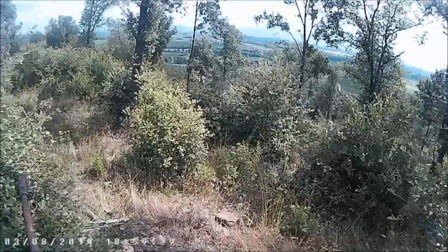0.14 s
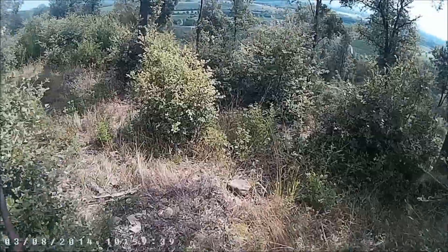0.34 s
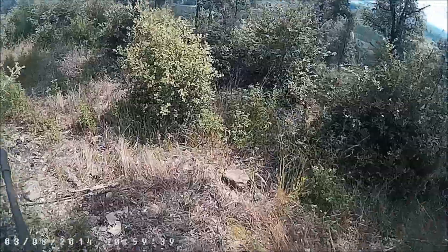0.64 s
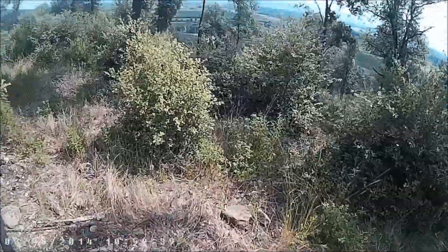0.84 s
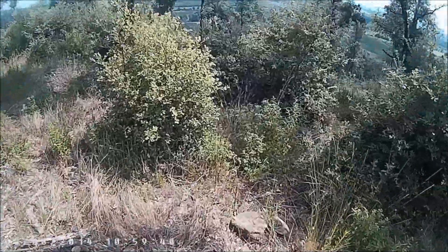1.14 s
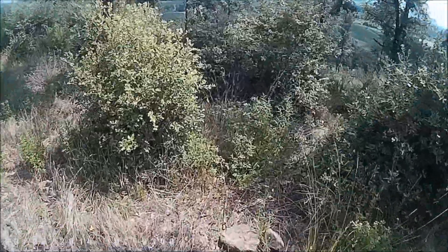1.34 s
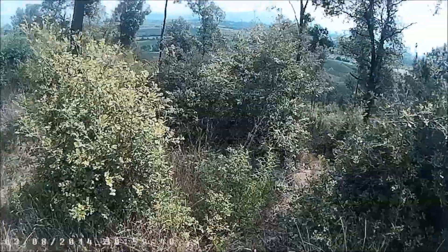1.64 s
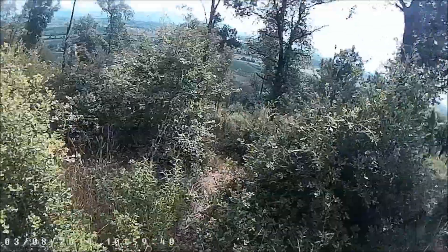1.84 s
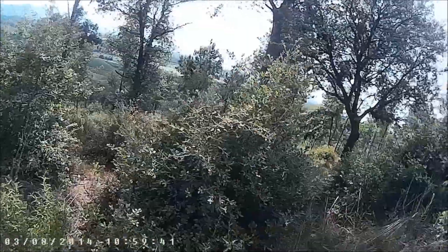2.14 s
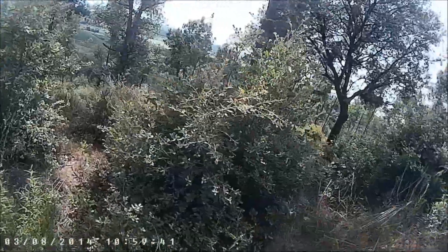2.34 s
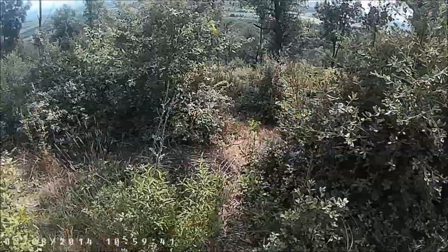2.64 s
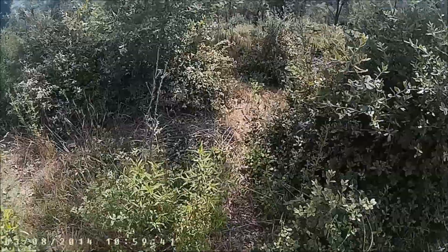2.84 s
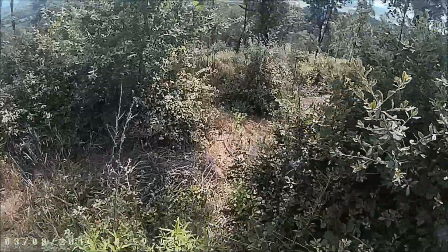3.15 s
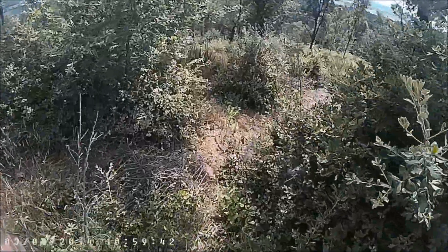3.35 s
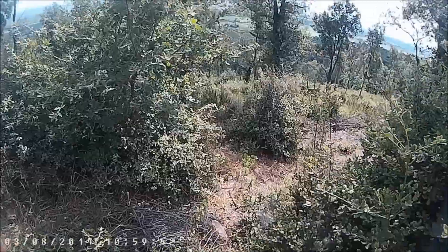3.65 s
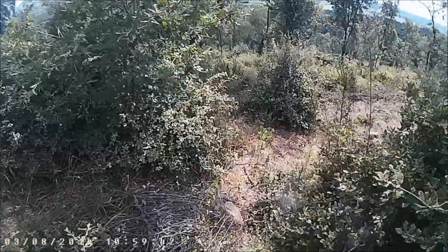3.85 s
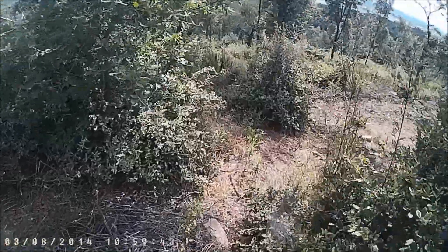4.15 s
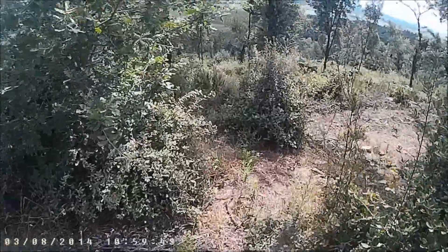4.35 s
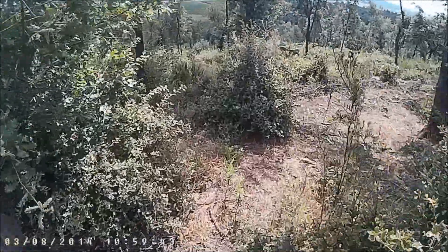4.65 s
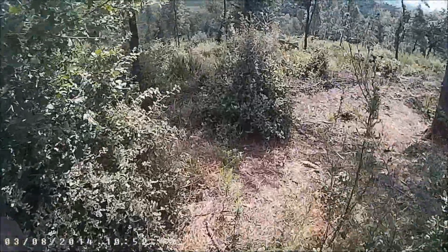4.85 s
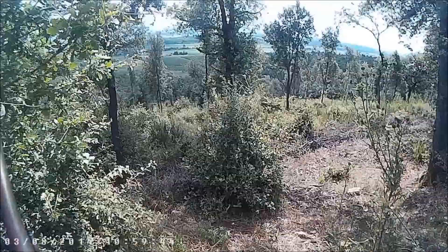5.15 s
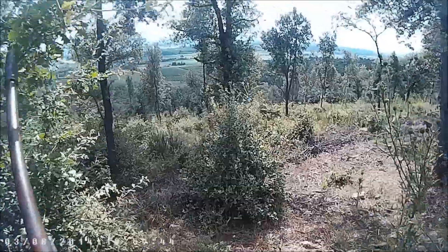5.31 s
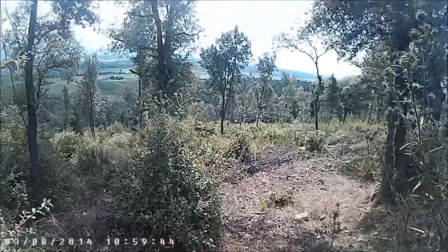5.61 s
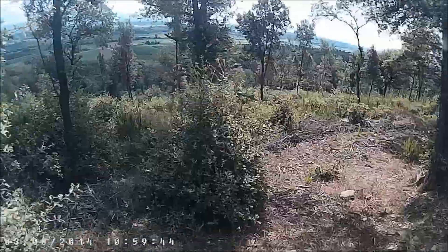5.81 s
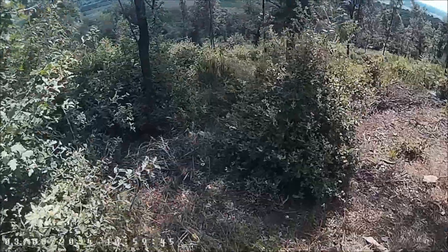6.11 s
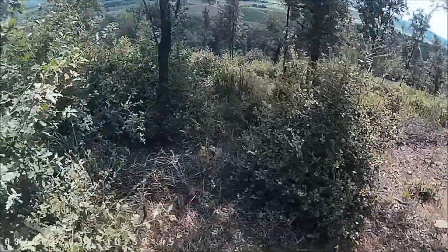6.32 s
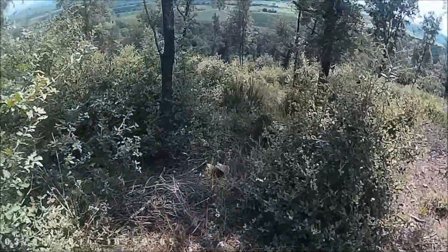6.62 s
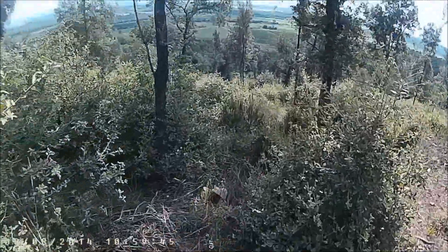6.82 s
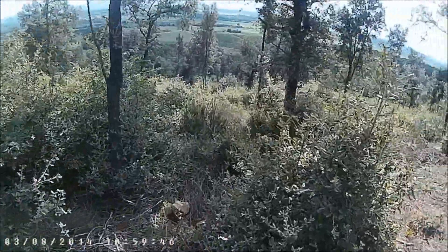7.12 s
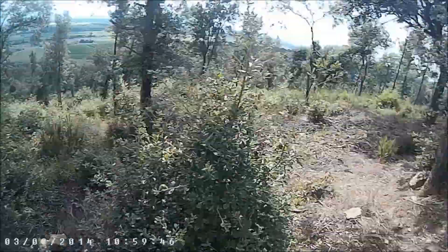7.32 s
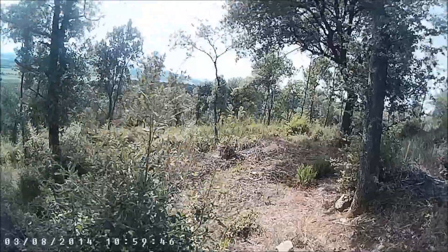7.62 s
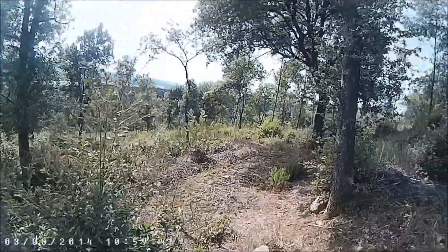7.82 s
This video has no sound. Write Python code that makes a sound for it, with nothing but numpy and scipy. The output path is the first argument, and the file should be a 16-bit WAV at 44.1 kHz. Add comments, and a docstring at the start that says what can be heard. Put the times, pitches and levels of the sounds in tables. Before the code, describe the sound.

Deep, irregular thumps and a swaying rumble dominate as a body-worn camera is carried through dry scrub. Quieter footsteps crunch on leaf litter, and leaves and branches brush past. Small twigs snap during the first heavy steps; midway a heavy footfall brings a cluster of plastic knocks and dull stick cracks. Softer steps follow, with another rattle near the end, over faint hiss and a very faint high whine.

```python
"""Walking through dry brush

A small camera is carried on the body. Each footfall sets its mount swaying with a deep thump,
and impacts excite the modes of the plastic case and the mount, heard as knocks and rattles.
Leaf litter and grass rustle and crackle with every stride and a few twigs snap,
over the hiss and thin whine of the electronics."""
import sys
import numpy as np
from scipy import signal
from scipy.fft import rfft, irfft, next_fast_len
from scipy.io import wavfile
from scipy.ndimage import map_coordinates

SR = 44100
rng = np.random.default_rng(int(sys.argv[2]) if len(sys.argv) > 2 else 0)


def generate_wav(signal):
    """Clip the signal to [-1, 1] and save it as 16-bit WAV at the path in sys.argv[1]."""
    frames = np.transpose(np.atleast_2d(signal))
    scaled = np.clip(frames, -1, 1) * 32767
    pcm = np.round(scaled).astype(np.int16)
    wavfile.write(sys.argv[1], SR, pcm)


N = 351477

# footfalls and lighter shifts of weight:
# (time [s], level [dB], rise [s], T60 [s], litter crunch [dB], following leaf swish [dB])
STEPS = [(0.0, -13, 0.0068, 0.27, -52, -63), (.201, -25, 0.14, 0.11, -63.5, -61.5),
         (.491, -10, .035, 0.52, -52, -62.5), (0.618, -24.5, 0.15, 0.33, -62, -60),
         (0.888, -9, 0.032, 0.43, -54.5, -59.5), (1.117, -11.5, .044, 0.55, -56, -56.5),
         (1.584, -13.5, 0.058, 0.25, -55.5, -60.5), (1.78, -30.5, 0.19, 0.52, -60.5, -62),
         (2.016, -16, .07, 0.35, -53, -61.5), (2.601, -19, .11, 0.46, -52.5, -62),
         (2.789, -24.5, 0.04, 0.43, -55, -60.5), (3.175, -19, 0.029, 0.59, -55, -57.5),
         (3.701, -7.5, 0.095, 0.4, -53.5, -81), (3.935, -17, 0.15, 0.3, -58, -57.5),
         (4.538, -19, .1, .3, -65, -60.5), (5.009, -20, 0.16, 0.21, -59, -60),
         (5.21, -32, 0.12, 0.78, -68, -63), (5.568, -16, 0.096, .6, -63.5, -59),
         (6.238, -21.5, 0.059, 0.43, -74, -61), (6.808, -34.5, 0.074, 1.0, -63, -62),
         (7.285, -14.5, 0.1, 0.25, -53, -61), (7.402, -26.5, 0.13, 0.2, -58, -63.5),
         (7.702, -27.5, .025, 0.45, -65, -69)]
# spectrum of a dull crack, from the case or a stick: (frequency [Hz], relative level [dB])
CRACK_SPECTRUM = [(300, 8), (900, 11.5), (1800, -4.5), (2500, 0), (2900, 4.5), (4400, -5.5), (5200, -39),
                  (9000, -56)]


def footfalls(sway_hz, wander, shudder_db):
    """Damped oscillation: each load swings the mount; its shudder grows nonlinearly with the load."""
    # spectrum of the shudder: (frequency [Hz], relative level [dB])
    shudder_spectrum = [(35, -6), (52, 4.5), (66, 5), (90, -9), (140, -20), (260, -58), (800, -120)]
    thumps, weight, t = np.zeros(N), np.zeros(N), np.arange(SR) / SR
    for s, db, rise, t60, _, _ in STEPS:
        swing = amp(db) * loading(t, rise, t60)
        drift = np.interp(t, np.linspace(0, 1, 25), rng.standard_normal(25))
        phase = 2 * np.pi * sway_hz * np.cumsum(1 + wander * drift) / SR
        add(thumps, s, swing * np.sin(phase))
        add(weight, s, swing)
    shudder = amp(shudder_db) * weight ** 1.87 * coloured(rng.standard_normal(N), shudder_spectrum)
    return thumps + shudder


def loading(t, rise, t60):
    """Onset and damping: weight comes onto the foot smoothly, then its effect decays exponentially."""
    onset = np.sin(np.pi / 2 * np.clip(t / rise, 0, 1)) ** 2
    return onset * amp(-60 * np.maximum(t - rise, 0) / t60)


def knocks(click_db, thud_db, crack_db, bump_db):
    """Impact excitation: hard contacts crack and ring case and mount; soft ones stir only the mount."""
    # hard contacts of the case: (time [s], click level [dB], thud level [dB], sharpness [dB])
    contacts = [(0.512, -30.5, -33, -8), (.53, -38, -25, 6), (.537, -38, -30, 3), (.576, -40.5, -44, 3),
                (.908, -31.5, -25, -1.5), (0.92, -39.5, -27, 1), (.975, -43.5, -33.5, 2),
                (.99, -41, -36, 0), (1.168, -47, -29.5, 6), (1.271, -34.5, -33.5, -7), (1.515, -39, -36, 0),
                (1.951, -37, -33.5, -1.5), (2.425, -40.5, -38, 2), (2.67, -35, -29, 1),
                (2.685, -35.5, -27, -3), (3.664, -46, -41.5, 7), (3.745, -40.5, -32, -8),
                (3.777, -21.5, -18.5, 0), (3.791, -40, -26.5, 2), (3.831, -38.5, -26, -4),
                (4.014, -46.5, -26.5, 9), (4.151, -29.5, -29, -1.5), (5.422, -33.5, -35, -3.5),
                (5.821, -30.5, -37, 7), (7.007, -50, -65, -4), (7.139, -48, -41, 0.5),
                (7.228, -41.5, -28.5, 9), (7.329, -44.5, -31, -3), (7.511, -48, -37, 0)]
    # soft bumps against the mount: (time [s], level [dB])
    bumps = [(.004, -28.5), (0.104, -36), (0.451, -38.5), (0.723, -29), (.786, -33), (1.613, -32),
             (1.792, -35.5), (2.636, -37.5), (2.85, -45), (3.187, -37.5), (3.62, -39.5), (3.767, -26),
             (3.947, -34.5), (3.998, -34.5), (4.046, -31), (5.106, -38), (5.161, -33.5), (7.345, -29),
             (7.366, -27), (7.397, -30), (7.712, -46)]
    # modes of the case and of the mount: (frequency [Hz], relative level [dB], T60 [s])
    case_modes = [(830, -2.5, 0.012), (999, -21, 0.078), (1180, 0, 0.033), (1313, 2, 0.014),
                  (1578, -10, 0.037), (1763, -20, 0.053), (2163, -10, 0.014)]
    mount_modes = [(60.5, -3.5, 0.11), (91.4, 0, 0.07), (150.8, -1, 0.052), (230.2, -1, 0.072),
                   (330.5, -12, 0.054), (400.5, -3, 0.051), (540, -7.5, 0.013)]
    out = np.zeros(N)
    for s, click, thud, sharpness in contacts:
        # a sharper contact brings out the upper modes and the crack
        modes = [(hz, db + 0.57 * sharpness * (hz > 1450), t60) for hz, db, t60 in case_modes]
        case = strike(modes, vary_db=4.5, chatter=0.52, chatter_t60=0.039, contact_s=0.001)
        mount = strike(mount_modes, vary_db=1.5, chatter=0.96, chatter_t60=0.052, contact_s=0.0016)
        add(out, s - 0.001, amp(click + click_db) * case)
        add(out, s - 0.003, amp(thud + thud_db) * mount)
        add(out, s, amp(click + sharpness + crack_db) * burst(CRACK_SPECTRUM, t60=0.017))
    for s, db in bumps + rattles(per_step=2, window_s=0.12, growth=0.96):
        mount = strike(mount_modes, vary_db=2.5, chatter=0.7, chatter_t60=0.023, contact_s=0.0046)
        add(out, s, amp(db + bump_db) * mount)
    return out


def strike(modes, vary_db, chatter, chatter_t60, contact_s):
    """Modal synthesis: an impulse and a brief chatter drive damped modes of randomly varied strength."""
    t = np.arange(SR // 5) / SR
    hz, db, t60 = np.transpose(modes)[:, :, None]
    db = db + vary_db * rng.standard_normal(db.shape)
    polarity = np.resize([1, -1], len(modes))  # neighbouring modes move in opposite senses
    ring = polarity @ (amp(db - 60 * t / t60) * np.sin(2 * np.pi * hz * t))
    ring *= 1 - np.exp(-t / contact_s)
    force = chatter * unit(rng.standard_normal(len(t)) * amp(-60 * t / chatter_t60)) / np.sqrt(len(t))
    force[0] += 1
    return unit_attack(signal.fftconvolve(ring, force)[:len(t)])


def rattles(per_step, window_s, growth):
    """Backlash: the loose mount bumps after each step, more so if heavy: (time [s], level [dB])."""
    firm_step_db, firm_rattle_db = -14, -46
    delays = window_s * rng.random((len(STEPS), per_step))
    return [(s + rise / 2 + delay, firm_rattle_db + growth * (db - firm_step_db))
            for (s, db, rise, *_), row in zip(STEPS, delays) for delay in row]


def mount_sway(level_db):
    """Resonance under random forcing: the walker's motion keeps the mount rumbling in a low band."""
    # spectrum of the sway: (frequency [Hz], relative level [dB])
    sway_spectrum = [(12, -48), (27, -11), (38, 6.5), (50, -3.5), (75, -11), (120, -24), (250, -75),
                     (800, -120)]
    return amp(level_db) * coloured(rng.standard_normal(N), sway_spectrum)


def brush(swish_db, scuff_db, leaves_db, grit_db, body_db):
    """Source and filter: leaves swish through the air; the crunch underfoot is dulled by the case."""
    # spectra of the leaves, the grit and the low scuff: (frequency [Hz], relative level [dB])
    leaf_spectrum = [(300, 4.5), (1500, 3.5), (3000, 3.5), (5000, 0.5), (9000, -1), (14500, -3),
                     (15700, -10.5)]
    grit_spectrum = [(600, -8.5), (950, -4.5), (1100, -0.5), (1210, 7), (1400, -2), (1620, -0.5),
                     (1900, -8), (2200, -9.5), (2550, -15.5), (3000, -15), (4200, -17), (6500, -23)]
    body_spectrum = [(50, -21), (90, -8.5), (150, -7), (225, -8.5), (310, -11.5), (400, -14), (600, -18.5),
                     (1000, -25), (1500, -86), (3000, -120)]
    leaves = amp(swish_db + leaves_db) * coloured(crackle(4000, spread_db=9.5, bed=2.5), leaf_spectrum)
    grit_gain = amp(scuff_db + grit_db + 1.38 * wobble(35))
    grit = grit_gain * coloured(crackle(500, spread_db=1, bed=1.0), grit_spectrum)
    body_gain = amp(scuff_db + body_db + 2.5 * wobble(22))
    body = body_gain * coloured(rng.standard_normal(N), body_spectrum)
    return leaves + grit + body


def stride_levels(roundness):
    """Incoherent sources add in power: swish and scuff levels [dB] from leaves, litter and a floor."""
    # branches and tall grass brushed in passing: (peak time [s], level [dB])
    branches = [(.03, -55.5), (.95, -67), (2.51, -67), (3.56, -69.5), (3.97, -65), (5.82, -58.5),
                (6.08, -69.5), (7.18, -66)]
    lag_s, rise_s, fall_s = 0.18, 0.16, 0.11  # the other leg swings through after each landing
    hiss_db, rumble_db = -65, -67.5  # what stays when the walker is still
    drag_db, crunch_growth = -0.3, 0.39  # scuff of dragging through leaves; crunch against weight
    t = np.arange(0, N, 100) / SR
    passes = [(s + lag_s, swish) for s, *_, swish in STEPS] + branches
    leaf_power = litter_power = 0
    for s, db in passes:
        distance = np.abs(t - s) / np.where(t < s, rise_s, fall_s)
        leaf_power += (amp(db) * np.exp(-distance ** roundness)) ** 2
    for s, _, rise, t60, crunch, _ in STEPS:
        litter_power += (amp(crunch) * loading(t - s, rise, t60) ** crunch_growth) ** 2
    swish = leaf_power + amp(hiss_db) ** 2
    scuff = litter_power + leaf_power * amp(drag_db) ** 2 + amp(rumble_db) ** 2
    return [np.interp(np.arange(N) / SR, t, 10 * np.log10(power)) for power in (swish, scuff)]


def crackle(per_second, spread_db, bed):
    """Poisson process: tiny fractures of uneven size on a bed of noise."""
    impulses = (rng.random(N) < per_second / SR) * rng.choice([-1, 1], N)
    sizes = amp(spread_db * np.clip(rng.standard_normal(N), -2, 2))
    return unit(unit(impulses * sizes) + bed * rng.standard_normal(N))


def twigs():
    """Brittle fracture: a stem breaks with a bright snap, a stick under the sole with a duller crack."""
    # dry stems close by and sticks underfoot: (time [s], level [dB])
    stems = [(0.032, -35.5), (0.507, -45), (0.868, -48), (1.131, -39.5)]
    sticks = [(.563, -57), (.866, -56), (3.725, -48), (3.847, -51), (7.347, -45)]
    # spectrum of a snapping stem: (frequency [Hz], relative level [dB])
    snap_spectrum = [(400, -12), (1250, 20), (2500, -4.5), (4000, -2.5), (7000, -7), (11000, -14),
                     (15000, -32)]
    out = np.zeros(N)
    for s, db in stems:
        add(out, s, amp(db) * burst(snap_spectrum, t60=0.021))
    for s, db in sticks:
        add(out, s, amp(db) * burst(CRACK_SPECTRUM, t60=0.017))
    return out


def burst(spectrum, t60):
    """Broadband transient: noise with a fast onset and exponential decay, shaped by a spectrum."""
    t = np.arange(SR // 20) / SR
    hz = np.fft.rfftfreq(len(t), 1 / SR)
    noise = rng.standard_normal(len(t)) * amp(-60 * t / t60) * (1 - np.exp(-t / 0.002))
    return unit_attack(irfft(rfft(noise) * spectral_gain(hz, spectrum), len(t)))


def whine(level_db, carrier_hz, frame_hz, side_db):
    """Modulation sidebands: a thin, wavering electronic tone is fringed at the camera's frame rate."""
    t = np.arange(N) / SR
    comb = 0
    for k in range(-7, 8):
        line_db = 0 if abs(k) < 2 else side_db - 0.7 * abs(k) - 6 * (k % 2 == 0)
        comb += amp(line_db) * np.sin(2 * np.pi * ((carrier_hz + k * frame_hz) * t + rng.random()))
    return amp(level_db + wobble(9.5)) * unit(comb)


def amp(db):
    """Amplitude ratio of a level in decibels."""
    return 10 ** (np.asarray(db) / 20)


def unit(x):
    """Normalisation to rms 1."""
    return x / np.sqrt(np.mean(x ** 2) + 1e-20)


def unit_attack(x):
    """Normalisation to rms 1 over the first 10 ms."""
    return x / np.sqrt(np.mean(x[:SR // 100] ** 2) + 1e-20)


def wobble(knots_per_s):
    """Slow random modulation: a spline through Gaussian knots."""
    knots = rng.standard_normal(int(N * knots_per_s / SR) + 4)
    return map_coordinates(knots, [np.arange(N) * knots_per_s / SR])


def spectral_gain(hz, spectrum):
    """Log-frequency interpolation of a gain between (frequency [Hz], level [dB]) points."""
    points_hz, db = np.transpose(spectrum)
    return amp(np.interp(np.log(hz + 1), np.log(points_hz), db))


def filtered(x, response):
    """Linear filtering: the spectrum of x times a frequency response."""
    size = next_fast_len(N + SR // 2)
    return irfft(rfft(x, size) * response(np.fft.rfftfreq(size, 1 / SR)), size)[:N]


def coloured(x, spectrum):
    """Spectral shaping of x, at rms 1."""
    return unit(filtered(x, lambda hz: spectral_gain(hz, spectrum)))


def add(track, s, sound):
    """Superposition of a sound on the track at time s."""
    start = int(np.clip(round(s * SR), 0, N - 1))
    track[start:start + len(sound)] += sound[:N - start]


def scene():
    """Superposition at one microphone; the sway swells with the scuff, the whine with the swish."""
    swish_db, scuff_db = stride_levels(roundness=1.68)
    sway = mount_sway(scuff_db + 18.5)
    steps = footfalls(sway_hz=38.41, wander=0.11, shudder_db=-0.5)
    rattle = knocks(click_db=1.5, thud_db=1.5, crack_db=-11.5, bump_db=-1)
    rustle = brush(swish_db, scuff_db, leaves_db=1.0, grit_db=1.0, body_db=6.5)
    snaps = twigs()
    electronics = whine(swish_db - 14, carrier_hz=7932, frame_hz=30.2, side_db=-2)
    return (steps + sway + rattle + rustle + snaps + electronics)[None]


def record(dry):
    """Band limiting: the camera loses the deepest bass and keeps nothing above its upper cutoff."""
    low_hz, top_hz = 24, 15700
    return filtered(dry[0], lambda hz: (hz < top_hz) * hz ** 6 / (hz ** 6 + low_hz ** 6))[None]


dry = scene()
out = record(dry)
generate_wav(out)
```